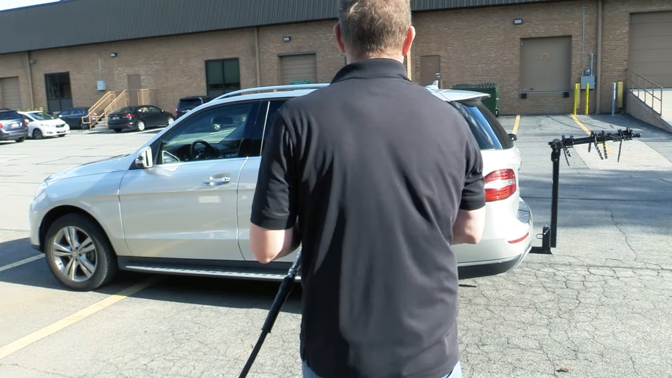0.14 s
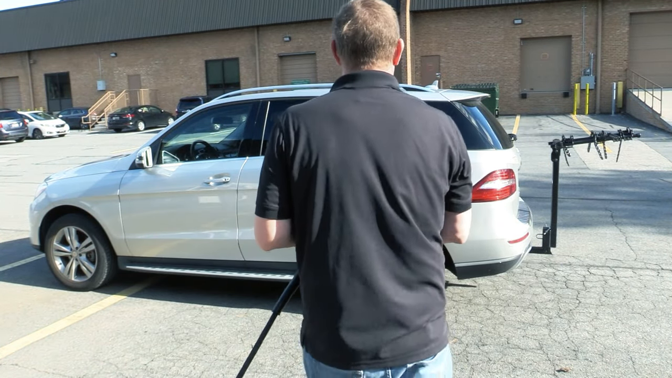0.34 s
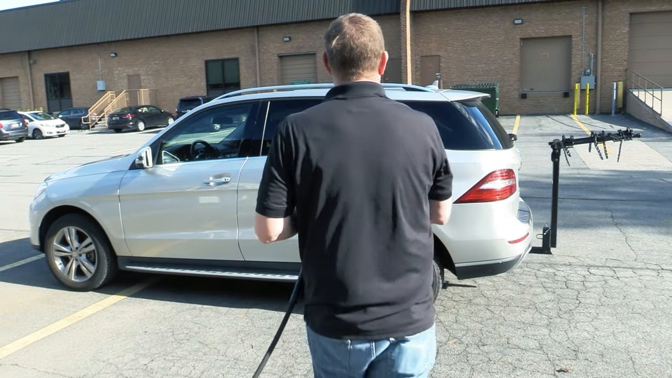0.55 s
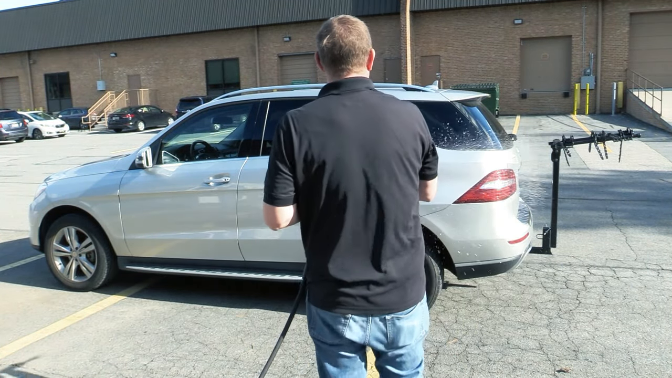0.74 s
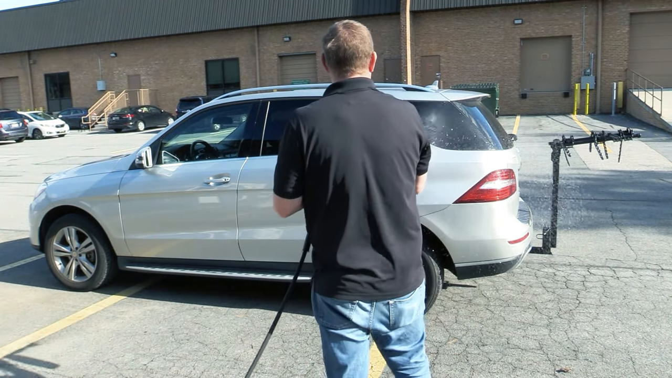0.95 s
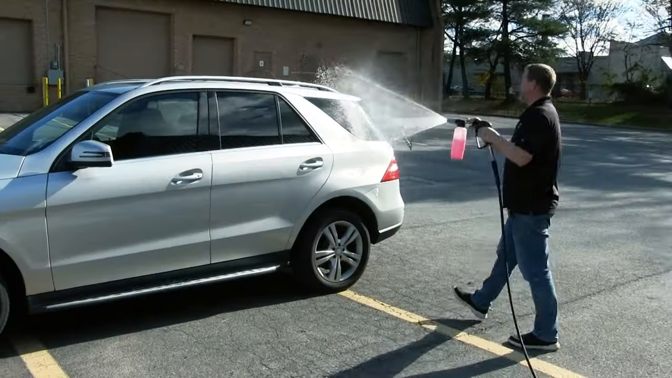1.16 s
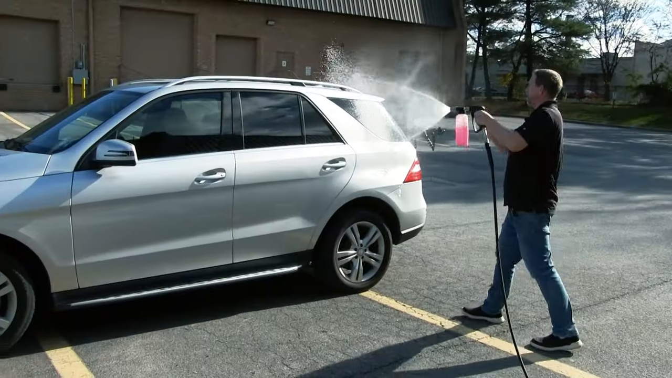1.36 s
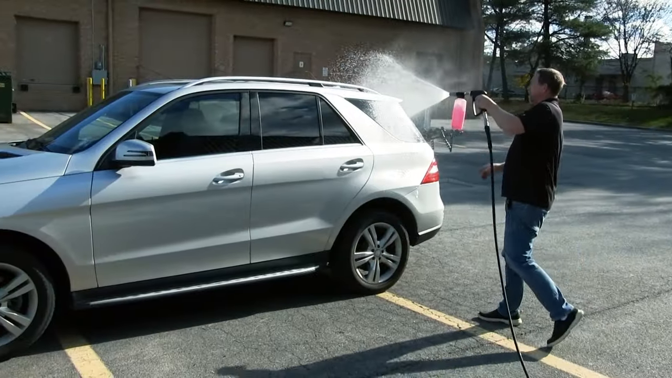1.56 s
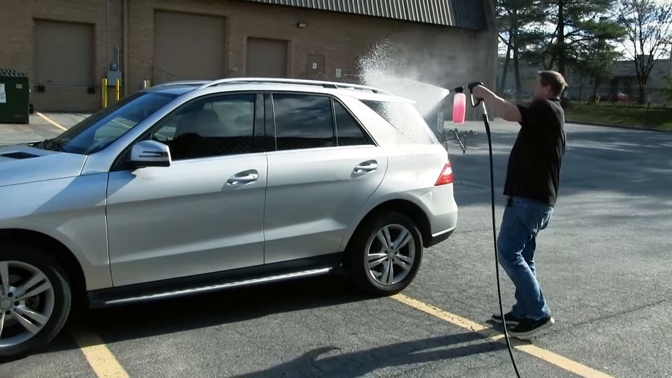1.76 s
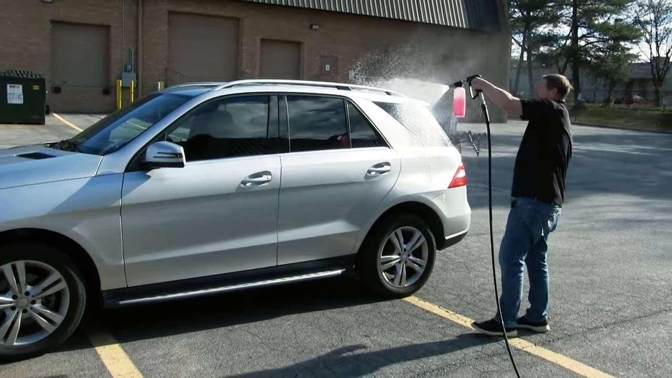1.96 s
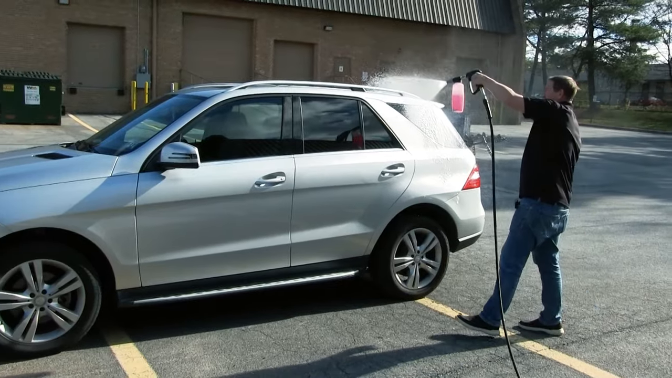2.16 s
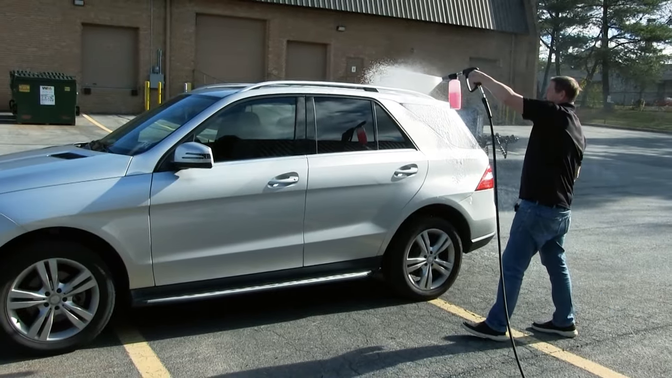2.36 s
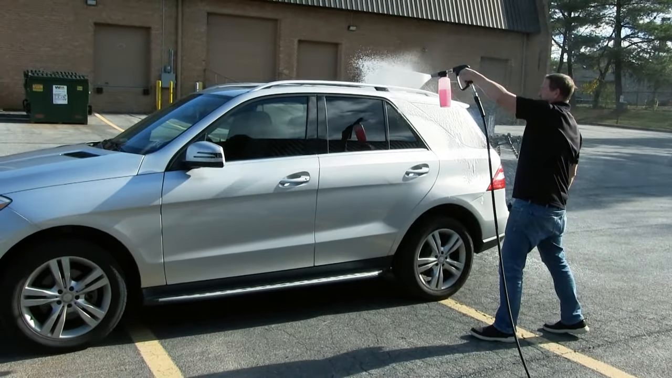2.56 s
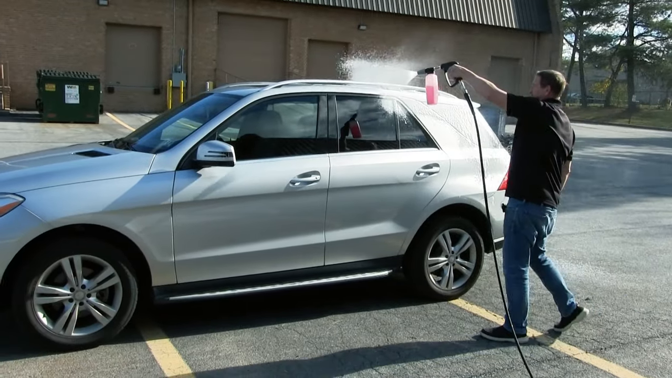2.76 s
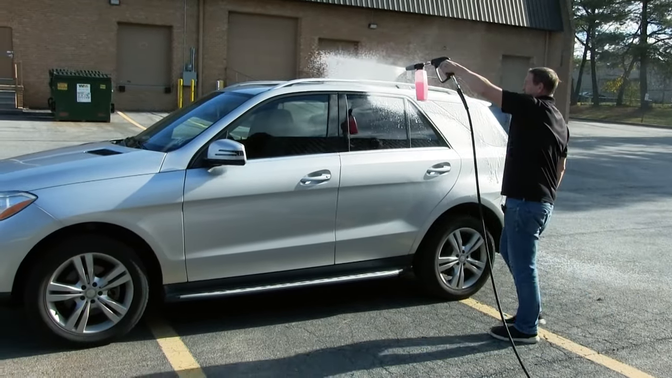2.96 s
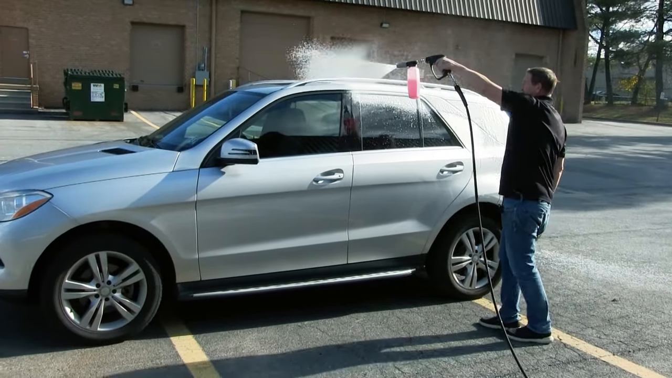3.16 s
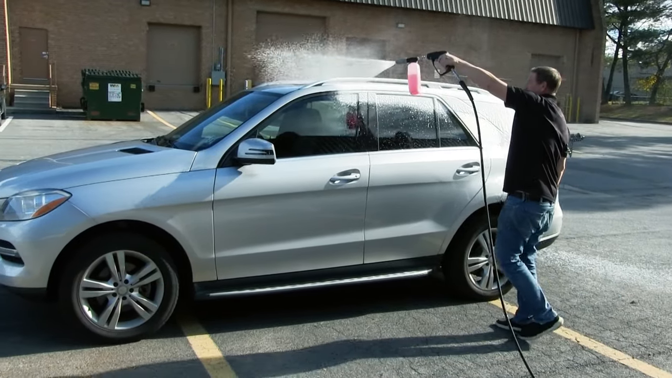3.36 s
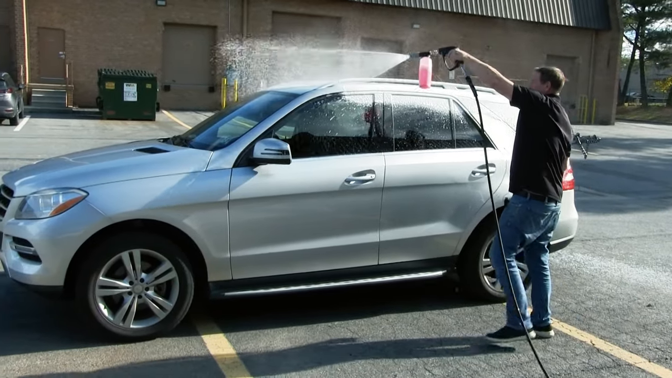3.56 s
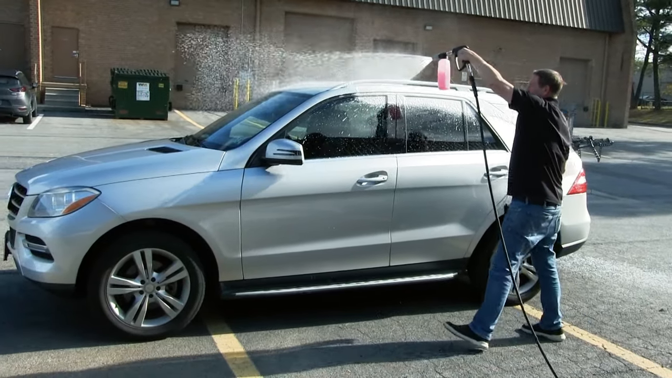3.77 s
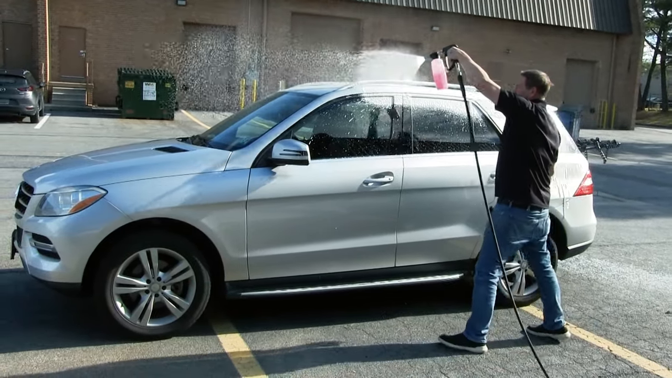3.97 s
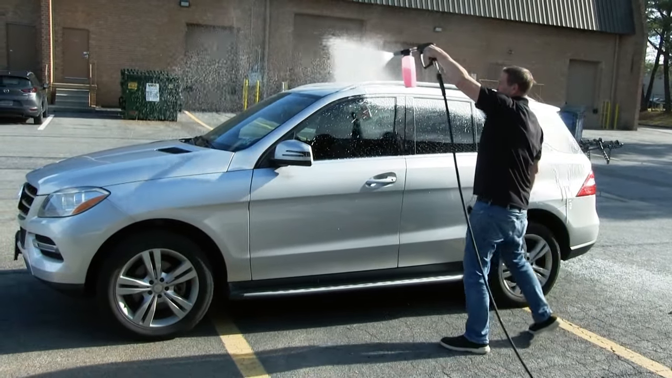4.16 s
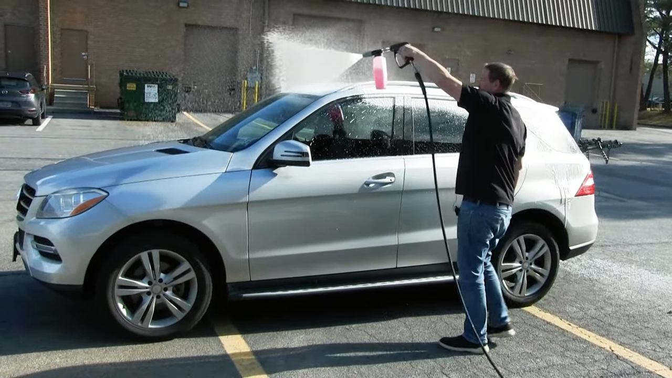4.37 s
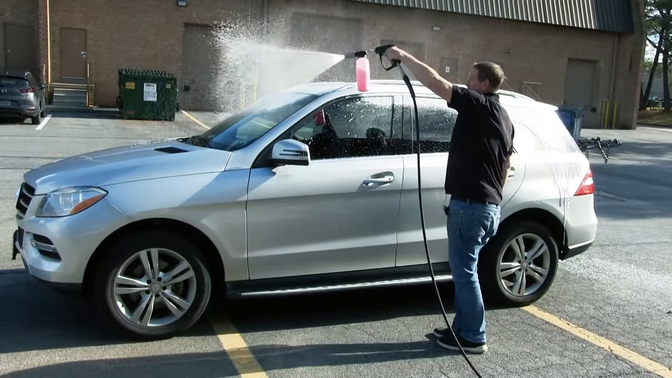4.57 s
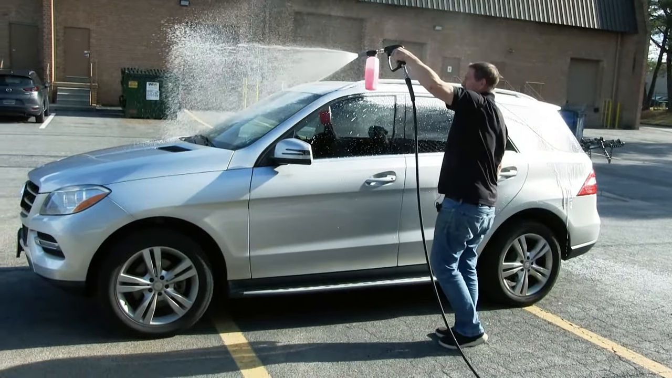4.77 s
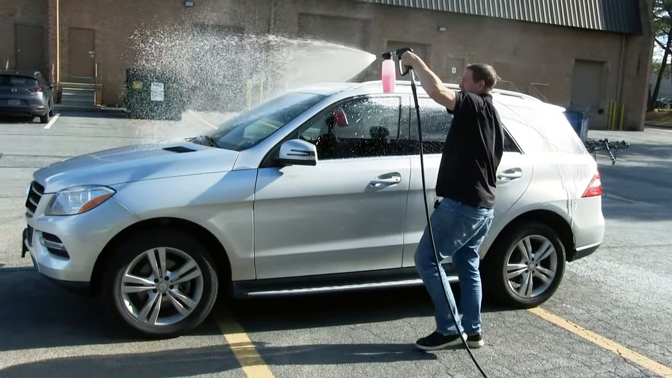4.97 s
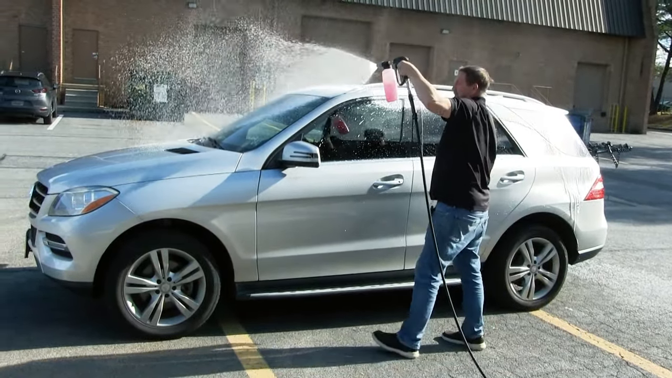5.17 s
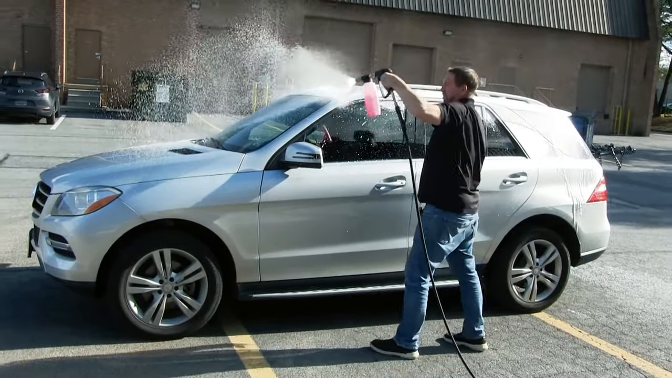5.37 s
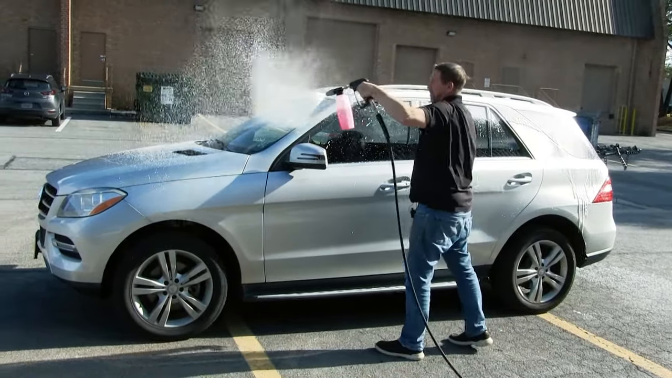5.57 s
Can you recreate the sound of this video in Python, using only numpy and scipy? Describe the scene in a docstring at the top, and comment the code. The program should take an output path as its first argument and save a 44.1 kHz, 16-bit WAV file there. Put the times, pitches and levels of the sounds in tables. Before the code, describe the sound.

After faint rustles and small clicks, a spray gun snaps open with a sputtering blast, then foam hisses steadily over a car outdoors.

```python
"""Hose and sleeve rustle while a spray gun clicks, over far traffic and a light breeze that last throughout.
The valve of a pressure washer's foam cannon snaps open, the nozzle sputters, and foam hisses over a car.
Rustle, traffic and wind are shaped noise; the clicks are short, fast-fading bursts of noise.
The foam is noise and tiny drop impacts, coloured or sent through moving resonances.
Delayed copies of the spray are its echoes off the car, and they change its colour as they shift."""
import sys
import numpy as np
from scipy import signal
from scipy.fft import rfft, irfft, next_fast_len
from scipy.io import wavfile
from scipy.ndimage import uniform_filter1d, map_coordinates

SR = 44100
rng = np.random.default_rng(int(sys.argv[2]) if len(sys.argv) > 2 else 0)


def wrap_up_sound(samples):
    """Save the sound to the file named by the first command line argument, as 16-bit audio."""
    columns = np.atleast_2d(samples).T
    # keep every value between -1 and 1, then stretch to whole-number steps
    tamed = np.clip(columns, -1, 1)
    steps = np.round(tamed * 32767).astype(np.int16)
    wavfile.write(sys.argv[1], SR, steps)


N = 247842
TIME_S = np.arange(N) / SR


def amp(db):
    """Turn decibels into gain."""
    return 10 ** (np.asarray(db) / 20)


def unit(x):
    """Scale x to an average strength (rms) of 1."""
    return x / np.sqrt(np.mean(x ** 2) + 1e-20)


def curves(rows, t=TIME_S):
    """Read each column after the time column, joined by straight lines, at the times t."""
    s, *cols = np.transpose(rows)
    return [np.interp(t, s, c) for c in cols]


def wobble(rate):
    """Draw a smooth random curve through rate random points a second."""
    points = rng.standard_normal(int(N * rate / SR) + 4)
    return map_coordinates(points, [np.arange(N) * rate / SR])


def swells(rows):
    """Add up smooth rises and falls of gain, given as rows of (peak_s, length_s, level_db)."""
    return sum(amp(db) * np.exp(-(2 * (TIME_S - s) / length) ** 2) for s, length, db in rows)


def filtered(x, response):
    """Multiply the spectrum of x by a response that depends on frequency."""
    size = next_fast_len(len(x) + 8192)
    spectrum = rfft(x, size) * response(np.fft.rfftfreq(size, 1 / SR))
    return irfft(spectrum, size)[:len(x)]


def coloured(x, spectrum):
    """Shape x with a table of (pitch_hz, level_db), then scale it to rms 1."""
    f, db = np.transpose(spectrum)
    return unit(filtered(x, lambda hz: amp(np.interp(np.log(hz + 1), np.log(f), db))))


def bell(hz, centre, half_width):
    """Gain of a resonance: 1 at its centre and a half at one half-width away."""
    return 1 / (1 + ((hz - centre) / half_width) ** 2)


def swept(x, gain):
    """Multiply x by a gain that depends on both frequency and time."""
    hz, t, z = signal.stft(x, SR, nperseg=1024, noverlap=768)
    return signal.istft(z * gain(hz[:, None], t), SR, nperseg=1024, noverlap=768)[1][:N]


def turbulence(patchy_db):
    """Make white noise uneven in random patches of pitch and time, like rough flow, at rms 1."""
    def patches(hz, t):
        field = rng.standard_normal((len(hz), len(t)))
        smooth_in_pitch = uniform_filter1d(field, size=8, axis=0)
        smooth = uniform_filter1d(smooth_in_pitch, size=24, axis=1)
        return amp(patchy_db * unit(smooth))
    return unit(swept(rng.standard_normal(N), patches))


def droplets(rate, scatter_db):
    """Scatter tiny impacts of mixed strength, on average rate a second, at rms 1."""
    lands = rng.random(N) < rate / SR
    sign = rng.choice([-1, 1], N)
    size_db = scatter_db * np.clip(rng.standard_normal(N), -2, 2)
    return unit(lands * sign * amp(size_db))


def resonance(centre_hz, half_width_hz):
    """Let turbulence and droplets ring at one pitch, which may move, at rms 1."""
    def gain(hz, t):
        centre = np.interp(t, TIME_S, np.broadcast_to(centre_hz, N))
        half_width = np.interp(t, TIME_S, np.broadcast_to(half_width_hz, N))
        # dividing by the root keeps wide and narrow ringing about equally strong
        return bell(hz, centre, half_width) / np.sqrt(half_width)
    drive = turbulence(patchy_db=3.0) + amp(-6.0) * droplets(rate=1000, scatter_db=9.5)
    return unit(swept(drive, gain))


# tone colour of the far traffic: pitch_hz, level_db (per Hz, relative)
TRAFFIC_COLOUR = [(60, -11), (110, -6), (160, -15), (250, -12), (450, -15.5), (800, -13), (1250, -19.5),
                  (2000, -26), (2800, -36.5), (4500, -43), (15000, -53)]
# tone colour of the rustling: pitch_hz, level_db (per Hz, relative)
RUSTLE_COLOUR = [(1000, 4), (2600, 2), (3300, 11), (3800, 0), (4400, -4), (5400, -2), (9000, -2),
                 (14000, -11.5), (16000, -12)]
# when hose and sleeve rustle: peak_s, length_s, level_db
RUSTLES = [(0.08, .25, -61), (0.198, 0.063, -55), (0.275, 0.036, -60), (0.42, .06, -64),
           (0.62, 0.15, -59.5)]


def surroundings():
    """Far traffic is steady shaped noise; hose and sleeve rub in swells of brighter, patchy noise."""
    traffic = amp(-47.0) * coloured(rng.standard_normal(N), TRAFFIC_COLOUR)
    rub = coloured(turbulence(patchy_db=3.0), RUSTLE_COLOUR)
    rustle = swells(RUSTLES) * amp(.6 * wobble(60)) * rub
    return traffic + rustle


# tone colour of the wind: pitch_hz, level_db (per Hz, relative)
WIND_COLOUR = [(11, -38), (18, 2), (70, 2.5), (105, -1.5), (150, -9.5), (190, -16), (250, -50), (420, -120)]
# gusts on top of the breeze: peak_s, length_s, level_db
GUSTS = [(1.3, 0.77, -39.5), (2.58, 0.27, -42)]
BREEZE_DB = -46.6  # typical level between gusts


def wind():
    """A light breeze and gusts push low rumble into two microphone ports almost alike."""
    common = coloured(rng.standard_normal(N), WIND_COLOUR)
    apart = amp(-22.0) * coloured(rng.standard_normal(N), WIND_COLOUR)
    strength = (amp(BREEZE_DB) + swells(GUSTS)) * amp(1.0 * wobble(10))
    left = common + apart
    right = amp(-0.9) * common - apart
    return strength * np.array([left, right])


# clicks of the gun and spits of foam:
# start_s, level_db (before the bass cut), pitch_hz, width_hz (full), fade_s (time to drop 60 dB)
CLICKS = [(0.042, -36, 1670, 600, 0.031), (0.0416, -38.5, 4470, 6000, 0.014),
          (0.186, -41.5, 2800, 1000, 0.024), (0.435, -46, 11000, 4000, .015),
          (0.4653, -33.5, 3460, 7000, 0.013), (0.467, -35.5, 1700, 1400, 0.027),
          (0.495, -48, 3000, 4000, .02), (0.7156, -17.5, 1460, 2290, 0.029), (0.7254, -2, 9200, 2840, 0.01),
          (0.7268, -14, 2600, 3500, 0.018), (1.336, -24.5, 4750, 300, 0.033),
          (1.337, -28, 3300, 250, 0.045), (1.4565, -17.5, 5100, 900, 0.028), (1.457, -25, 3260, 500, 0.034),
          (4.877, -30, 4350, 400, .06)]
CLICK_LOWEST_HZ = 750


def clicks():
    """Trigger, valve and clots of foam snap: noise rings briefly at one pitch and fades fast."""
    out = np.zeros(N)
    t = np.arange(SR // 8) / SR
    for start_s, level_db, pitch_hz, width_hz, fade_s in CLICKS:
        decay = amp(-60 * t / fade_s)
        ringing = filtered(rng.standard_normal(len(t)), lambda hz: bell(hz, pitch_hz, width_hz * .5))
        snap = decay * ringing
        # every snap gets the energy of its decay curve before its level is set
        snap *= np.linalg.norm(decay) / np.linalg.norm(snap)
        out[round(start_s * SR):][:len(t)] += amp(level_db) * snap
    # small plastic parts radiate little bass
    bass_cut = signal.butter(2, CLICK_LOWEST_HZ, "highpass", fs=SR, output="sos")
    return signal.sosfilt(bass_cut, out)


OPEN_S = 0.7155  # the moment the valve opens
AIR_END_S, AIR_RELEASE_S = 1.0, 0.07  # when the air starts to run out, and how long that takes
# change of each layer while air is in the line: the jet is louder and little foam lands
AIR_HISS_DB, AIR_RASP_DB, AIR_FIZZ_DB, AIR_WASH_DB = 7, 5.5, 3.5, -11
BLAST_S, BLAST_LENGTH_S, BLAST_DB = .748, 0.055, 8  # peak time, length and boost


def trapped_air():
    """Give 1 while air is still in the line, falling to 0 once the line is full."""
    return np.clip(1 - (TIME_S - AIR_END_S) / AIR_RELEASE_S, 0, 1)


def blast_boost_db():
    """Pressure built up behind the valve overshoots in one short blast, as a boost in dB."""
    return BLAST_DB * swells([(BLAST_S, BLAST_LENGTH_S, 0)])


# the jet's main resonance, moving with the aim of the gun:
# time_s, pitch_hz, level_db (before the air and blast boosts)
RASP = [(1.0, 3270, -44), (1.15, 3700, -39), (1.27, 3400, -44.5), (1.345, 3320, -37), (1.62, 3280, -35.5),
        (1.87, 3730, -38.5), (2.12, 3800, -44), (2.32, 3770, -45.5), (2.52, 3600, -37.5),
        (3.2, 3700, -35.5), (3.47, 3620, -52.5), (3.72, 3750, -37.5), (3.95, 3460, -48.5), (4.5, 3620, -36),
        (4.85, 3700, -41), (5.28, 3790, -38.5), (5.48, 3770, -41), (5.62, 3630, -36.5)]


def rasp_motion():
    """Give the rasp's pitch, its level, and how far that level is above its average, in dB."""
    pitch_hz, level_db = curves(RASP)
    return pitch_hz, level_db, level_db - level_db.mean()


# tone colour of the broad hiss: pitch_hz, level_db (per Hz, relative)
HISS_COLOUR = [(300, -20), (900, -7), (1600, -18), (2300, -2.5), (2900, 1), (4000, -9.5), (5000, -1),
               (5900, 3), (7000, -18), (8600, 0.5), (10200, -2), (12200, -5), (13300, -14), (16000, -38)]
HISS_DB, HISS_TRADE = -37.5, 0.55  # starting level; dB lost per dB that the rasp rings louder
HISS_FADE_DB_PER_S = 1.67  # as the gun moves away
SPLASH_S, SPLASH_LENGTH_S, SPLASH_DB = 5.54, 0.28, -32.5  # the fan strikes the windscreen


def hiss():
    """The fan's broad hiss is rough flow and drops; the more the jet rings, the less hiss is left."""
    patter = turbulence(patchy_db=1.3) + amp(-5) * droplets(rate=1500, scatter_db=5)
    _, _, ring_db = rasp_motion()
    level_db = HISS_DB - HISS_TRADE * ring_db + AIR_HISS_DB * trapped_air()
    level_db -= HISS_FADE_DB_PER_S * (TIME_S - OPEN_S)
    splash = swells([(SPLASH_S, SPLASH_LENGTH_S, SPLASH_DB)])
    return (amp(level_db + .5 * blast_boost_db()) + splash) * coloured(patter, HISS_COLOUR)


# how the treble rises and falls, high while the fan faces the microphone:
# time_s, level_db (only its distance from the average is used)
TREBLE = [(1.08, -42.5), (1.37, -47), (1.47, -38.5), (1.81, -43), (2.29, -35), (3.13, -34.5), (3.71, -45),
          (3.77, -36), (4.08, -32), (4.19, -50), (4.56, -50.5), (5.19, -48), (5.24, -32.5), (5.33, -35),
          (5.43, -29), (5.62, -39.5)]
# tone colour of the mist: pitch_hz, level_db (per Hz, relative)
MIST_COLOUR = [(3000, -13), (6500, 1), (8800, 0), (10000, 1.5), (11300, 2), (12500, 3.5), (14000, 0),
               (15000, -4.5), (16000, -29)]
MIST_DB, MIST_GROWS = -39.5, 1.12  # level at average treble; dB gained per dB of treble


def mist():
    """Very fine drops make a bright prickle that flickers and follows the treble curve."""
    prickle = turbulence(patchy_db=1.6) + amp(-1) * droplets(rate=3000, scatter_db=5)
    treble_db, = curves(TREBLE)
    level_db = MIST_DB + MIST_GROWS * (treble_db - treble_db.mean())
    level_db += AIR_FIZZ_DB * trapped_air() + 1.4 * wobble(260)
    return amp(level_db) * coloured(prickle, MIST_COLOUR)


# loudness of foam on the panels: time_s, level_db (before the trim and air change in wash)
WASH_LEVEL = [(1.1, -38), (1.7, -37), (4.65, -40), (5.4, -34.5), (5.62, -37.5)]
# tone colour of foam on the panels: pitch_hz, level_db (per Hz, relative)
WASH_COLOUR = [(60, -29), (170, -4), (300, -6), (600, 1), (1000, 0.8), (1600, -2.5), (3000, -8),
               (8000, -55.8)]


def wash():
    """Foam landing on the panels is a duller patter of drops, weak while air is in the line."""
    drops = turbulence(patchy_db=1.1) + amp(-6) * droplets(rate=700, scatter_db=1.0)
    level_db = curves(WASH_LEVEL)[0] - 2.0 + AIR_WASH_DB * trapped_air()
    return amp(level_db) * coloured(drops, WASH_COLOUR)


# level of the hollow note: time_s, level_db (before the core and skirt trims)
NOTE_LEVEL = [(0.85, -38.5), (1.1, -32), (1.28, -36.5), (1.52, -42), (1.75, -34.5), (2.22, -38.5),
              (2.5, -35), (2.8, -37.5), (3.15, -36), (3.42, -36), (3.85, -35), (4.7, -35.5), (5.62, -38)]
# the core of the note spreads once the fan reaches the windscreen: time_s, half_width_hz
HOLLOW_WIDTH = [(1.0, 94), (3.8, 62), (4.85, 64), (5.3, 190)]
HOLLOW_HZ, HOLLOW_HZ_PER_DB = 1292, 5.5  # pitch at average level; the note sags as it weakens


def hollow_note():
    """A hollow tone rings through the spray, with a core on a steady skirt."""
    level_db, = curves(NOTE_LEVEL)
    pitch_hz = HOLLOW_HZ + HOLLOW_HZ_PER_DB * (level_db - level_db.mean())
    core = amp(-1.5) * resonance(pitch_hz, curves(HOLLOW_WIDTH)[0])
    skirt = amp(-4.0) * resonance(pitch_hz, half_width_hz=155)
    return amp(level_db) * (core + skirt)


# a second resonance above the rasp: time_s, pitch_hz, level_db (before the trim and boosts)
CHIRR = [(0.9, 3950, -36), (1.15, 4260, -31), (1.28, 4330, -38), (1.45, 4850, -34.5), (1.85, 5080, -34),
         (2.08, 4230, -36.5), (2.3, 4630, -36), (2.8, 4350, -45), (3.15, 4140, -38.5), (3.65, 4200, -40.5),
         (3.95, 4560, -31), (4.6, 4400, -40.5), (4.95, 4330, -35.5), (5.35, 4480, -35), (5.62, 4600, -46)]
RASP_WIDTH_HZ, CHIRR_WIDTH_HZ = 245, 580  # half-widths, the rasp's at its average level
RASP_SHARPENS = .02  # about the share of its width that the rasp loses per dB of ringing


def rasp():
    """The jet rings in two moving resonances, stronger with trapped air and in the first blast."""
    pitch_hz, level_db, ring_db = rasp_motion()
    half_width_hz = RASP_WIDTH_HZ * np.exp(-RASP_SHARPENS * ring_db)
    main = amp(level_db) * resonance(pitch_hz, half_width_hz)
    chirr_hz, chirr_db = curves(CHIRR)
    chirr = amp(chirr_db - 1.5) * resonance(chirr_hz, CHIRR_WIDTH_HZ)
    return amp(AIR_RASP_DB * trapped_air() + blast_boost_db()) * (main + chirr)


# the sizzle higher up: time_s, pitch_hz, level_db
SIZZLE = [(0.77, 6150, -43), (0.88, 6200, -40), (1.27, 6550, -35), (1.5, 5940, -32.5), (1.7, 6100, -39),
          (2.0, 6550, -30.5), (2.3, 6950, -32.5), (2.7, 6400, -39), (3.5, 7000, -37), (3.92, 6800, -35),
          (4.15, 6750, -39), (4.95, 6920, -33), (5.3, 6850, -30), (5.62, 6300, -33)]


def sizzle():
    """A wide resonance drifts around 6 to 7 kHz."""
    pitch_hz, level_db = curves(SIZZLE)
    return amp(level_db) * resonance(pitch_hz, half_width_hz=870)


# level of the fizz near 8 kHz: time_s, level_db (before the air boost)
FIZZ_LEVEL = [(0.79, -36.5), (0.88, -28), (1.0, -34.5), (1.12, -34.5), (1.27, -37.5), (1.48, -30.5),
              (2.0, -38), (2.35, -33.5), (3.55, -37.5), (3.9, -49), (4.35, -44), (5.25, -52), (5.5, -35)]
FIZZ_RATIO = 2.295  # pitch of the fizz over that of the rasp


def fizz():
    """A high resonance glides along with the rasp, at a fixed multiple of its pitch."""
    rasp_hz, _, _ = rasp_motion()
    level_db = curves(FIZZ_LEVEL)[0] + AIR_FIZZ_DB * trapped_air()
    return amp(level_db) * resonance(FIZZ_RATIO * rasp_hz, half_width_hz=580)


def jet():
    """The fan of foam is the sum of its hiss, drops and resonances."""
    return hiss() + mist() + wash() + hollow_note() + rasp() + sizzle() + fizz()


GARGLE_HZ, GARGLE_DB = 1725, -30  # pitch, and level while air is in the line
GARGLE_DROP_DB, GARGLE_FADE_DB_PER_S = 12.5, 8  # drop as the air runs out, and fade from then on
# the last pocket of air: peak time, length, level and fall in pitch
POCKET_S, POCKET_LENGTH_S, POCKET_DB, POCKET_SINK_HZ_PER_S = 1.535, 0.38, -41.5, 1800


def purge():
    """Trapped air sputters through the nozzle and dies away; a last pocket follows, sinking in pitch."""
    gargle_db = GARGLE_DB - GARGLE_DROP_DB * (1 - trapped_air())
    gargle_db -= GARGLE_FADE_DB_PER_S * np.maximum(TIME_S - AIR_END_S, 0)
    gargle = amp(gargle_db) * resonance(GARGLE_HZ, half_width_hz=250)
    since_peak_s = np.clip(TIME_S - POCKET_S, -POCKET_LENGTH_S, POCKET_LENGTH_S)
    pocket_hz = GARGLE_HZ - POCKET_SINK_HZ_PER_S * since_peak_s
    pocket_swell = swells([(POCKET_S, POCKET_LENGTH_S, POCKET_DB)])
    pocket = pocket_swell * resonance(pocket_hz, half_width_hz=190)
    return (gargle + pocket) * amp(1.5 * wobble(110))


# the first echo off the car, mostly sooner as the gun nears the roof: time_s, delay_ms
ECHO = [(0.75, 5.7), (1.52, 5.0), (1.82, 4.6), (2.08, 3.85), (2.5, 3.1), (3.1, 2.3), (3.42, 1.88),
        (3.75, 1.6), (4.4, 1.53), (4.75, 1.53), (5.05, 1.75), (5.25, 1.97), (5.62, 1.9)]
# echoes returned by roof, rail and glass: delay_multiple (of the first delay), share (of its strength)
PANELS = [(1, 1), (1.2, .7), (1.38, .6), (1.5, .45)]
ECHO_AT_1_MS = .3  # gain of the first echo at 1 ms delay, before the overall level is evened out
BUILD_S, BUILD_DB = 0.027, 5  # pressure builds behind the opened valve: time taken, starting deficit


def spray():
    """The flow starts almost at once, flutters, and is coloured by its own echoes off the car."""
    since_s = TIME_S - OPEN_S
    valve = np.clip(since_s / 0.00087, 0, 1)
    flutter_db = 0.17 * wobble(45) + .5 * wobble(220)
    flow_db = 0.4 - BUILD_DB * np.clip(1 - since_s / BUILD_S, 0, 1) + flutter_db
    direct = valve * (jet() + purge()) * amp(flow_db)
    delay_ms, = curves(ECHO)
    lag = delay_ms * SR / 1000  # in samples
    strength = ECHO_AT_1_MS / delay_ms
    echoes = sum(share * map_coordinates(direct, [np.arange(N) - multiple * lag])
                 for multiple, share in PANELS)
    # even out the energy that the echoes add
    echo_energy = strength ** 2 * sum(share ** 2 for multiple, share in PANELS)
    return (direct + strength * echoes) / np.sqrt(1 + echo_energy)


def scene():
    """Add everything up; all but the wind reaches both channels alike."""
    return surroundings() + wind() + clicks() + spray()


TOP_HZ = 15780  # middle of the 300 Hz wide slope at the top of the band


def record(dry):
    """Round off the loudest peaks softly, then remove everything above the band limit."""
    rounded = dry / (1 + np.abs(dry / .8) ** 6) ** (1 / 6)

    def band_limit(hz):
        return np.clip((TOP_HZ - hz) / 300 + .5, 0, 1)
    return np.array([filtered(channel, band_limit) for channel in rounded])


dry = scene()
out = record(dry)
wrap_up_sound(out)
```